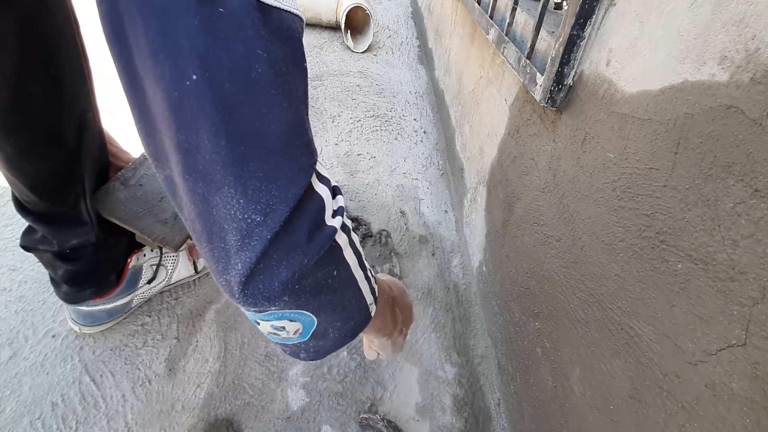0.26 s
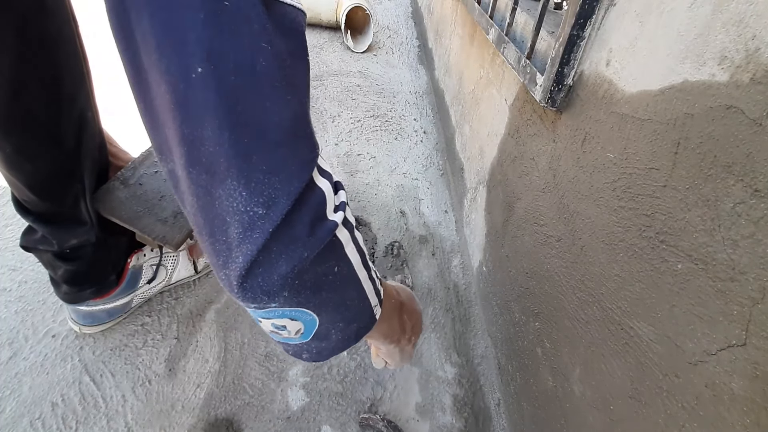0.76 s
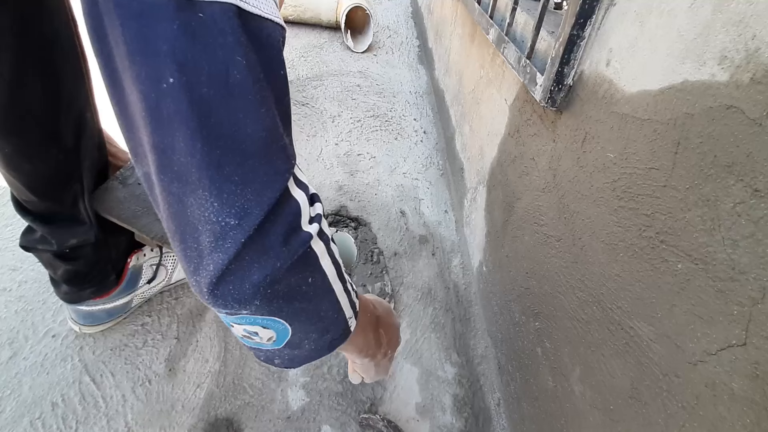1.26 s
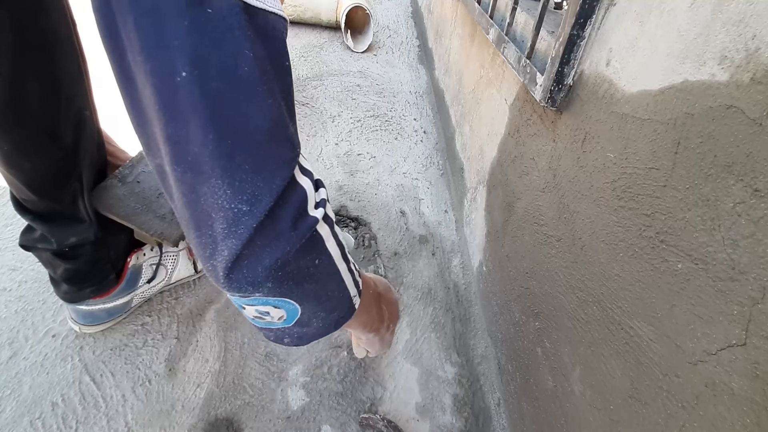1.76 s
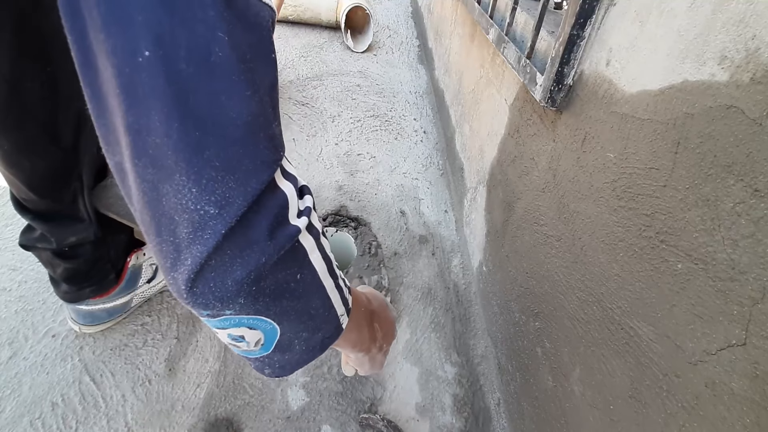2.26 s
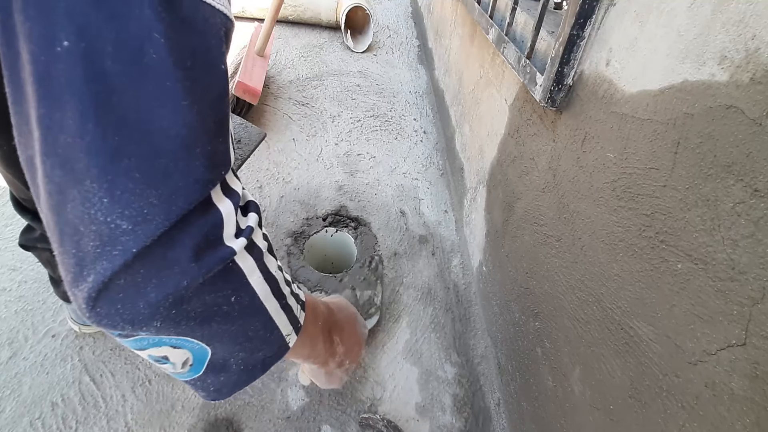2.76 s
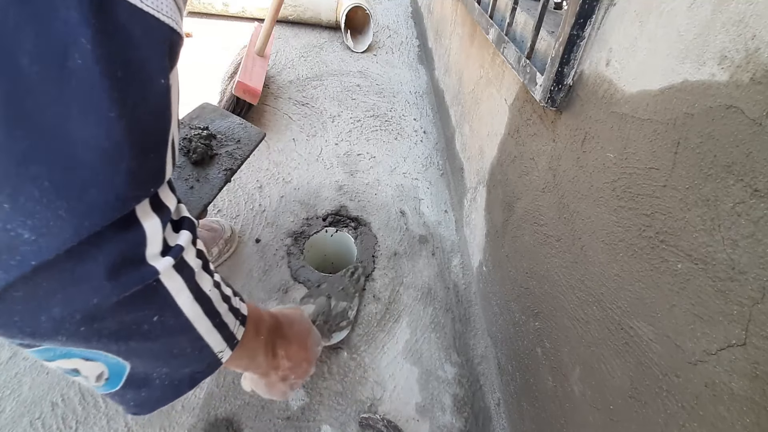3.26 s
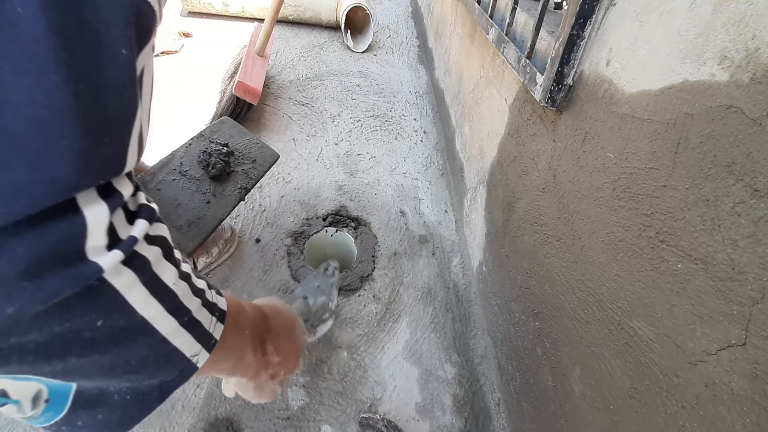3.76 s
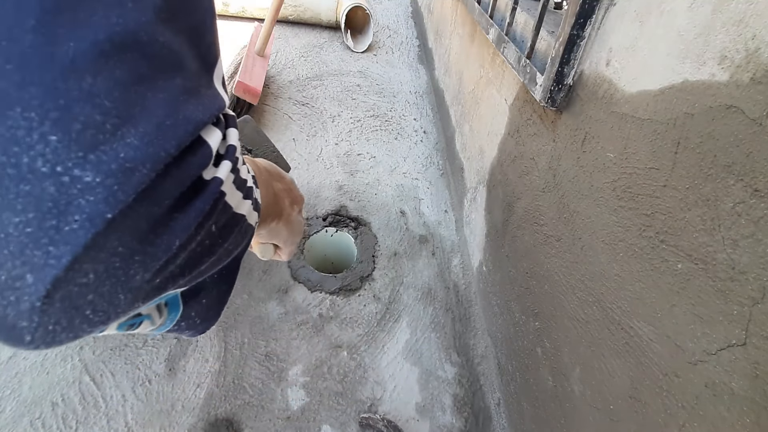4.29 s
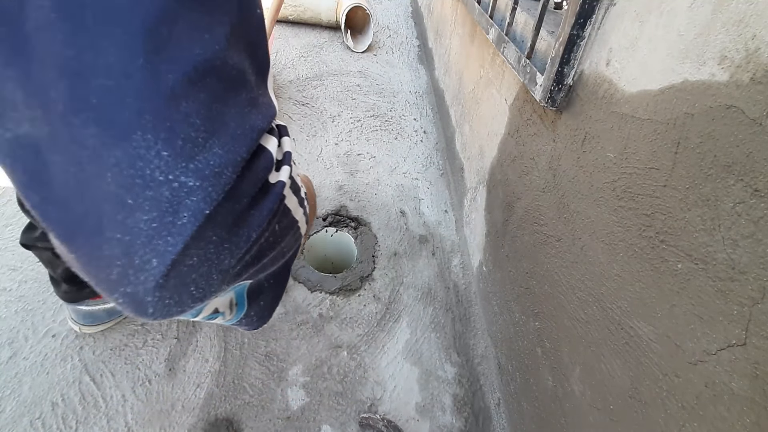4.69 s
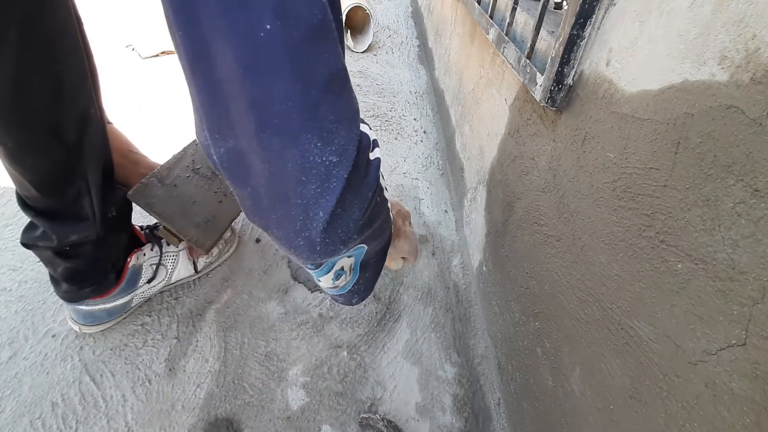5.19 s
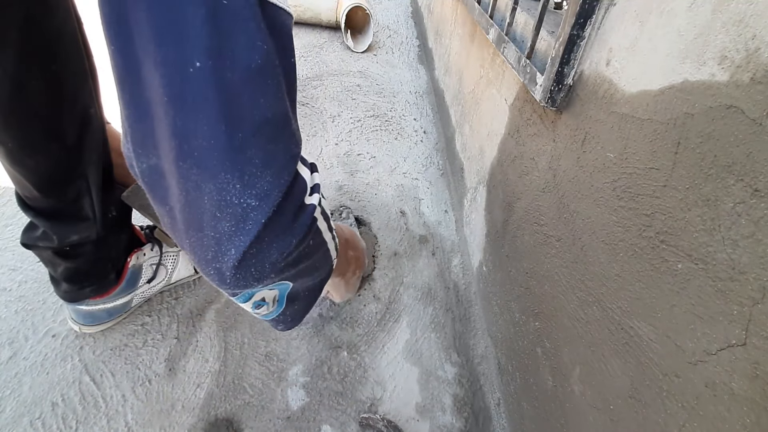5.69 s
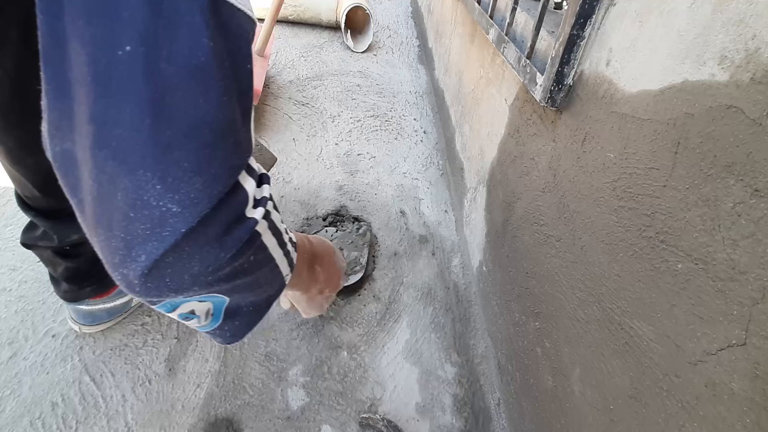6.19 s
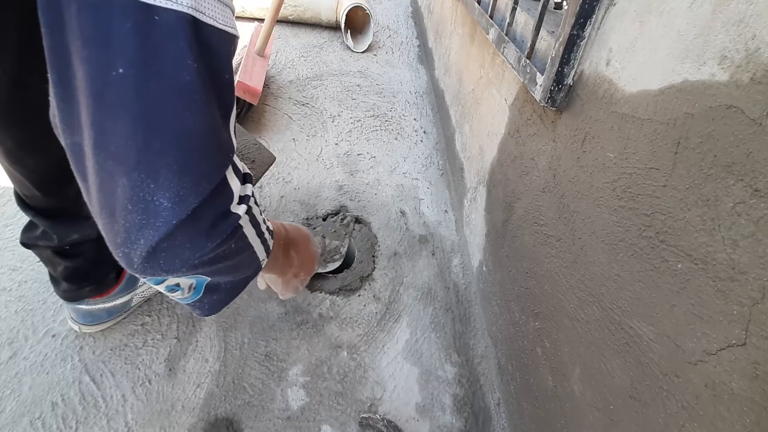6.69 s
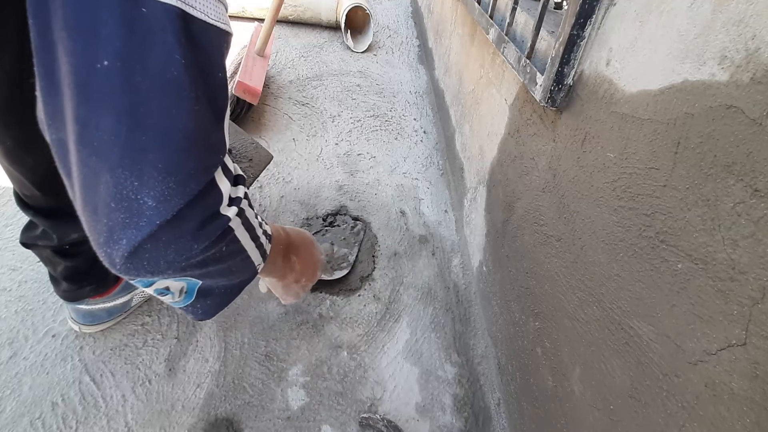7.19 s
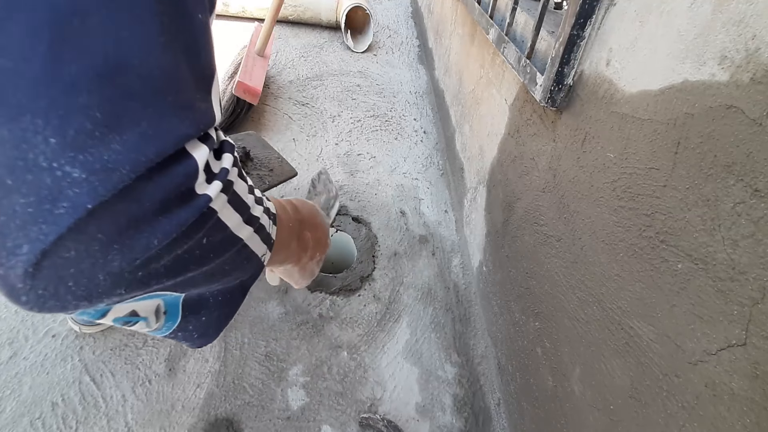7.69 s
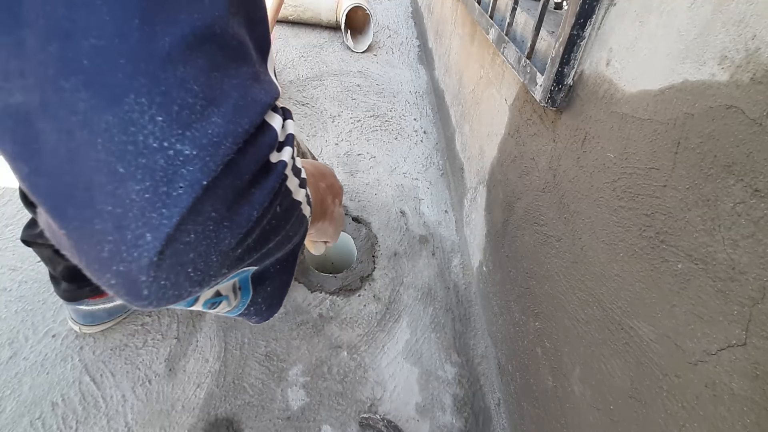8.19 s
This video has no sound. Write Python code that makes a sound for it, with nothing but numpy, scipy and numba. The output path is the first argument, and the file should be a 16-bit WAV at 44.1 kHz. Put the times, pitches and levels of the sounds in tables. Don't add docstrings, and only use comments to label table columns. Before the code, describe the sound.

Handheld stereo phone, close to a mason at work in a small walled yard. Bright, rough metal-on-grit scrapes come about every half second, with sharp snags and brief blade ring. Past four seconds they turn lighter and wetter, with a firm pass over a hollow pipe rim around six and a half. Quiet low rumble lies underneath; dull handling knocks appear near three seconds and most heavily near the end.

```python
import sys
import numpy as np
from scipy import signal
from scipy.fft import rfft, irfft
from scipy.io import wavfile
from scipy.ndimage import uniform_filter1d
from numba import njit

SR = 44100
rng = np.random.default_rng(int(sys.argv[2]) if len(sys.argv) > 2 else 0)


def put_to_file(sound):
    columns = np.atleast_2d(sound).T
    safe = np.clip(columns, -1, 1)
    whole_steps = np.round(safe * 32767)
    wavfile.write(sys.argv[1], SR, whole_steps.astype(np.int16))


def invert_db(x):
    u = np.asarray(x, float) / 20
    return 10 ** u


N = 372644

# time in [s], pressure of the edge on the grit in [dB].
FLOOR_STROKES = [
    [(0.0, -37), (0.07, -44), (0.14, -45), (0.152, -60), (0.17, -87.5)],
    [(0.44, -66), (0.48, -65.5), (0.5, -52), (0.546, -36.5), (0.666, -48.5), (0.718, -33.5), (0.76, -84)],
    [(1.088, -64.5), (1.14, -54), (1.222, -50.5), (1.232, -46), (1.372, -37.5), (1.42, -56.5), (1.465, -62),
     (1.49, -50), (1.566, -42.5), (1.61, -96)],
    [(1.802, -59), (1.842, -46.5), (1.92, -37.5), (2.068, -36), (2.108, -46), (2.135, -67)],
    [(2.39, -42), (2.5, -36), (2.57, -40.5), (2.59, -33.5), (2.624, -33), (2.685, -67.5)],
    [(2.946, -52.5), (3.0, -47), (3.04, -34.5), (3.086, -25.5), (3.16, -45.5), (3.19, -63.5)],
    [(3.45, -40.5), (3.488, -35.5), (3.666, -38.5), (3.705, -58)],
]
# time in [s], pressure in [dB].
MORTAR_STROKES = [
    [(4.218, -61), (4.316, -50.5), (4.53, -60.5), (4.58, -64.5), (4.63, -51), (4.67, -78)],
    [(5.17, -93), (5.242, -75.5), (5.3, -92)],
    [(5.727, -65.5), (5.78, -57.5), (5.82, -53), (5.93, -56.5), (6.005, -57), (6.022, -44.5), (6.075, -53),
     (6.12, -72)],
    [(6.35, -69.5), (6.408, -54.5), (6.546, -33.5), (6.625, -49.5), (6.65, -70), (6.689, -57)],
    [(6.69, -65), (6.706, -48.5), (6.89, -45.5), (6.986, -46.5), (7.07, -67.5)],
    [(7.22, -76), (7.275, -51), (7.31, -38.5), (7.482, -48.5), (7.51, -59.5)],
    [(7.56, -84.5), (7.636, -73), (7.736, -83), (7.95, -81)],
    [(8.17, -91.5), (8.19, -67), (8.316, -44), (8.45, -73.5)],
]
# bend in [Hz], bend in [dB] over grit,
# then gains in [dB] of the modes near 3, 4.3 and 5.5 kHz.
GRIPS = [(1632, -5.5, 2, 3, -4), (1680, -5, -1.5, -4.5, 0.5), (1665, -4.5, -2, 3, -5),
         (1620, -4.5, 2, 3.5, 0), (1664, -1.5, -2, 4, -6), (1680, 1.35, -3.5, 0, 3.5),
         (1649, 3.5, 2, -9, -0.5), (1520, -8, -4.5, -10, -14), (1510, -12, -14.5, -12, -12),
         (1604, -11.5, -6, -4, -6), (1580, -8, -1, -26, -5.5), (1500, -13, -1.5, -5, 3),
         (1560, -12, -3, -4, 0.5), (1545, -10, -9, -2, -3), (1390, -6, -5.5, -11, -13)]
# hollow under it in [Hz], hollow in [dB],
# edge fizz in [dB] over grit, left minus right in [dB].
PLACES = [(6010, -3, -12, -0.7), (5630, 10.5, -8.5, -2.5), (4800, -10, -11, 0.5), (7900, -19, -10, -1.2),
          (3900, -9, -8.5, -1.5), (3000, -1, -7.5, -0.5), (5600, -6, -8, -1), (7200, -7, -9, -0.5),
          (5900, 6, 4, 2.1), (3620, 7, -2.5, -0.5), (3980, -0.5, -8, 0), (3100, 3, -4.5, 0),
          (3940, -10, -4, 0), (4500, -2, -10, 3.5), (5200, -22.5, -9.5, 2)]
FIRM_DB, FIZZ_GAIN_PER_DB, BEND_GAIN_PER_DB = -41.5, 0.15, 0.2341
# time in [s], peak in [dB], blade bend in [dB] over it.
FLOOR_SNAGS = [(0.0388, -18, -6.5), (0.1121, -28.5, -31), (0.4963, -40, -24), (0.545, -19, -9),
               (0.623, -26.5, 10), (0.6961, -23, -8.5), (1.0899, -42, -9.5), (1.1551, -38.5, 2.5),
               (1.2276, -30.5, -13), (1.3349, -33.5, -4.5), (1.496, -36, -21), (1.5564, -29.5, -4),
               (1.8357, -32, -13), (1.9131, -23, -5), (1.956, -25.5, -20), (2.0099, -17, -7),
               (2.0629, -21.5, -8), (2.394, -36.5, 2), (2.4541, -20.5, -3), (2.5023, -13.5, -12),
               (2.582, -21.5, -25), (2.9512, -28.5, -15.5), (3.0416, -13.5, -6), (3.1475, -27.5, -0.5),
               (3.4553, -19.5, 3), (3.4874, -12, -3.5), (3.5416, -15, -6.5), (3.563, -20, -9),
               (3.6, -14.5, -12), (3.668, -24, -24)]
# time in [s], peak in [dB], decay t60 in [s].
MORTAR_SNAGS = [(4.2202, -44.5, .11), (4.3027, -31.5, 0.033), (4.5341, -42, 0.033), (5.245, -62, .03),
                (5.7304, -38, .05), (5.8088, -32.5, 0.038), (6.0186, -34, 0.048), (6.415, -30.5, 0.092),
                (6.4714, -42, .029), (6.502, -18, 0.054), (6.5333, -17.5, 0.046), (6.693, -34.5, 0.04),
                (6.871, -31, 0.13), (6.9187, -23.5, .05), (7.2785, -43, 0.037), (7.31, -30, 0.16),
                (8.2901, -39, 0.14), (8.3211, -22, 0.036)]
FLOOR_SNAG_T60_S, MORTAR_BEND_DB = 0.076, -20
# frequency in [Hz], density in [dB per Hz].
GRIT_COLOUR = [(150, -34), (280, -8.5), (600, -15), (1100, -11), (1900, -4.5), (3000, -5), (4500, -4.4),
               (6200, -6.7), (7600, -9), (9500, -19), (12000, -43.5)]
# frequency in [Hz], density in [dB per Hz].
FIZZ_COLOUR = [(4120, -40.5), (7000, -7.5), (9460, -12), (11800, -4), (12700, -7), (15000, -6.5),
               (16000, -14.5)]
# frequency in [Hz], width in [Hz], level in [dB],
# left minus right in [dB], lag of the right microphone port in [cycles].
PRESSED_BLADE = [(2437, 90, -13, 7, 0.082), (2960, 36, -11.5, -3.5, 0.34), (3427, 120, -12, 5.5, 0.19),
                 (3641, 220, -19.5, -7, 0.077), (4434, 130, -5.5, 3.5, 0.13), (5330, 130, -10.5, 5.5, 0.86),
                 (5900, 200, -15.5, 0.5, 0.31), (6700, 200, -21.5, -5, 0.93)]
BEND_WIDTH_HZ, BEND_PAN_DB = 150.0, 11.5
# frequency in [Hz], level in [dB], decay t60 in [s].
FREE_BLADE = [(1240, -5.5, 0.22), (1564, -14.5, 0.062), (2350, -8, 0.14), (3040, 4.5, 0.11),
              (3600, -13.5, 0.06), (4500, -10, 0.058), (6920, -25.5, 0.11)]
# time in [s], level in [dB].
LIFTS = [
    (.73, -54.5),
    (2.119, -59),
    (3.165, -51),
    (3.672, -39),
    (5.733, -51),
    (7.48, -59),
]
# start in [s], length in [s], boom in [dB],
# fade in [dB] over that length.
CROSSINGS = [(4.215, 0.13, -54.5, -12), (5.55, 0.13, -70, -3.5), (5.733, 0.22, -55, -6),
             (6.024, 0.056, -49, 1), (6.409, 0.082, -43.5, -7), (6.5, 0.11, -38, -8.5),
             (6.691, .1, -49, -0.5), (6.812, .1, -57, -1), (6.919, 0.125, -43, -19),
             (7.277, 0.091, -39, -7.5), (7.363, 0.13, -52, -6.5)]
PIPE_HZ, PIPE_WIDTH_HZ, RIM_EASE_S = 444.0, 62, 0.015
YARD_T60_S, YARD_DB = 0.28, -25.5
# frequency in [Hz], density in [dB per Hz].
TOWN_COLOUR = [(120, -36.5), (200, -4.5), (283, -1.5), (394, -12.5), (696, -13.5), (1000, -20), (1350, -26),
               (1600, -26), (1850, -35.5), (2600, -45), (8740, -50.5), (14600, -45), (16000, -49.5)]
TOWN_DB, TOWN_SWELL_DB = -58, 0.8
# frequency in [Hz], density in [dB per Hz].
RUMBLE_COLOUR = [(12, -62.5), (20, -33.5), (32, -21.5), (44, -5), (65, 2), (118, -1.5), (187, -8),
                 (220, -8.5), (290, -45), (480, -120)]
RUMBLE_DB, RUMBLE_WANDER_DB = -51, 1.5
# frequency in [Hz], correlation in [0-1].
LIKENESS = [(40, .45), (80, .62), (130, .85), (350, .85), (600, .3), (1500, .15), (5000, 0)]
# time in [s], rise in [dB], width in [s].
SHIFTS = [
    (1.15, 3, 0.062),
    (2.14, 4, .06),
    (2.73, 0.5, 0.092),
    (3.06, 10, 0.11),
    (6.05, 2.5, 0.086),
    (7.3, -1, 0.1),
    (8.32, 8.5, 0.12),
]
# time in [s], level in [dB], pitch in [Hz], decay t60 in [s].
THUMPS = [
    (2.091, -35, 50, 0.11),
    (3.041, -37.5, 110.2, 0.18),
    (3.486, -40, 297, 0.1),
    (3.547, -45, 270, .09),
    (8.221, -34, 62.7, 0.12),
    (8.271, -23, 60, 0.083),
    (8.356, -42.5, 61.4, 0.058),
]
TOP_HZ = 15700


def rms1(x):
    return x / np.sqrt(np.mean(x ** 2))


def on_log_hz(points, floor=None):
    hz, value = np.transpose(points)
    bins = np.maximum(np.arange(N // 2 + 1) * SR / N, 1)
    return np.interp(np.log(bins), np.log(hz), value, floor, floor)


def colour(x, spectrum):
    return irfft(rfft(x) * rms1(invert_db(on_log_hz(spectrum, floor=-90))), N)


@njit
def band(x, hz, width):
    y, b, l = np.empty(len(x)), 0., 0.
    for i in range(len(x)):
        g, k = np.tan(np.pi * hz[i] / SR), width / hz[i]
        v = (b + g * (x[i] - l)) / (1 + g * (g + k))
        b, l, y[i] = 2 * v - b, l + 2 * g * v, k * v
    return y


def mode(x, hz, width_hz):
    r = np.exp(-np.pi * width_hz / SR)
    return signal.lfilter([np.sqrt(2 * (1 - r * r))], [1, -r * np.exp(2j * np.pi * hz / SR)], x)


def walk(rate):
    hold = int(SR / rate)
    steps = np.repeat(rng.standard_normal(N // hold + 1), hold)
    return rms1(uniform_filter1d(uniform_filter1d(steps, hold), hold)[:N])


def pan(db):
    return invert_db(np.array([db, -db]).reshape(2, -1) / 2)


def background():
    t = np.arange(N) / SR
    shifts_db = sum(db * np.exp(-((t - s) / width) ** 2) for s, db, width in SHIFTS)
    hand = invert_db(RUMBLE_DB + RUMBLE_WANDER_DB * walk(5) + shifts_db)

    def layer():
        town = invert_db(TOWN_DB + TOWN_SWELL_DB * walk(4.6)) * colour(rng.standard_normal(N), TOWN_COLOUR)
        return town + hand * colour(rng.standard_normal(N), RUMBLE_COLOUR)

    mid, side = layer(), layer()
    like = np.clip(on_log_hz(LIKENESS), 0, 1)
    side = irfft(rfft(side) * np.sqrt((1 - like) / (1 + like)), N)
    return np.array([mid + side, mid - side])


def strokes():
    t, levels, grip = np.arange(N) / SR, np.zeros((3, N)), np.zeros((7, N))
    for stroke, hold, place in zip(FLOOR_STROKES + MORTAR_STROKES, GRIPS, PLACES):
        bend_hz, bend_db, *modes_db = hold
        gap_hz, gap_db, fizz_db, pan_db = place
        s, db = np.transpose(stroke)
        light = np.clip(FIRM_DB - db, -12, 25)
        over = (0, bend_db + BEND_GAIN_PER_DB * light, fizz_db + FIZZ_GAIN_PER_DB * light)
        inside = (t >= s[0]) & (t <= s[-1])
        ease = np.minimum((s[-1] - t[inside]) / 0.02, 1)
        levels[:, inside] = [ease * invert_db(np.interp(t[inside], s, db + rel)) for rel in over]
        held = np.array([bend_hz, *modes_db, gap_hz, gap_db, pan_db])
        grip[:, t >= s[0] - 0.005] = held[:, None]
    return levels, grip


def sand(spread_db, patchy_db, patch_rate):
    size_db = spread_db * np.minimum(rng.exponential(size=N), 5)
    grains = rng.standard_normal(N) * invert_db(size_db)
    return rms1(grains * invert_db(patchy_db * walk(patch_rate)))


def snags():
    grit, push, t = np.zeros(N), np.zeros(N), np.arange(N) / SR
    stones = [(s, db, bend_db, FLOOR_SNAG_T60_S) for s, db, bend_db in FLOOR_SNAGS]
    stones += [(s, db, MORTAR_BEND_DB, t60) for s, db, t60 in MORTAR_SNAGS]
    for s, db, bend_db, t60 in stones:
        start = max(s - 0.0012, 0)
        span = slice(int(start * SR), int((s + 0.15) * SR))
        age = np.maximum(t[span] - start, 0)
        rest = np.sqrt(max(1 - invert_db(2 * bend_db), 0.05))
        rise = 1 - np.exp(-age / 0.0014)
        crumble = invert_db(db - 5.5 - 60 * age / max(t60, 0.008))
        crack = invert_db(db - 9.5 - 60 * age / 0.0068)
        grit[span] += rest * rise * (crumble + crack)
        push[span.start] += np.sign(rng.standard_normal()) * invert_db(db + bend_db + 16)
    return grit, push


def ports(x, twist, turn_rate, count=6, size=256):
    out, power = 0, 0
    for _ in range(count):
        phase = twist * np.cumsum(rng.standard_normal((2, size // 2 + 1)), axis=1)
        paths = irfft(np.exp(1j * (phase - phase[:, :1])), size)
        paths = np.roll(paths, size // 2, axis=1)
        share = walk(turn_rate)
        heard = signal.oaconvolve(x[None], paths, axes=1)[:, size // 2:N + size // 2]
        out = out + share * heard
        power = power + share ** 2
    return out / np.sqrt(power)


def crunch(grains, force, gap_hz, gap_db):
    grit = colour(grains * force, GRIT_COLOUR)
    grit = grit + invert_db(gap_db - 4.0) * band(grit, np.clip(gap_hz, 2000, 9000), 900.)
    return invert_db(-3.0) * ports(grit, twist=0.5, turn_rate=35)


def pressed_blade(grains, force, modes_db):
    rings = 0
    for hz, width, db, pan_db, lag in PRESSED_BLADE:
        group = int(hz > 3700) + int(hz > 4900)
        drive = grains * force * invert_db(modes_db[group] + 4 * walk(40))
        swing = np.exp(2j * np.pi * np.cumsum(hz * (1 + 0.018 * walk(7))) / SR)
        ring = mode(drive / swing, 0, width) * swing
        turn = np.exp(-2j * np.pi * (lag + 0.24 * walk(14)))
        rings = rings + invert_db(db - 2.5) * pan(pan_db) * np.real([ring, ring * turn])
    return rings


def blade_bend(grains, force, press, bend, push, bend_hz):
    bend = np.sqrt(np.maximum(bend ** 2 - (invert_db(-11) * press) ** 2, 0))
    bend_hz = np.clip(bend_hz * (1 + 0.022 * walk(18)), 1200, 2000)
    shake = np.minimum(force / (press + 1e-9), 2.5) * invert_db(3 * walk(45))
    flex = band(grains * shake * bend * invert_db(-4.0) + push, bend_hz, BEND_WIDTH_HZ)
    flex = band(flex, bend_hz, 430.0) * np.sqrt(SR / np.pi / BEND_WIDTH_HZ)
    return pan(BEND_PAN_DB) * np.array([flex, np.roll(flex, shift=4)])


def edge_fizz(force, press, fizz):
    dust = sand(spread_db=3.5, patchy_db=4.0, patch_rate=110)
    dust = dust * force * np.minimum(fizz / (press + 1e-9), 3)
    return invert_db(-1.5) * ports(colour(dust, FIZZ_COLOUR), twist=0.55, turn_rate=40) * pan(-0.99)


def trowel():
    (press, bend, fizz), grip = strokes()
    bend_hz, modes_db, (gap_hz, gap_db, pan_db) = grip[0], grip[1:4], grip[4:]
    hit, push = snags()
    force = np.hypot(invert_db(1.5) * press, hit)
    grains = sand(spread_db=3.5, patchy_db=2.0, patch_rate=70)
    blade = crunch(grains, force, gap_hz, gap_db) + pressed_blade(grains, force, modes_db)
    blade = blade + blade_bend(grains, force, press, bend, push, bend_hz)
    blade = blade + edge_fizz(force, press, fizz)
    return blade * pan(pan_db) + pipe(grains)


def yard(x):
    t = np.arange(int(0.6 * SR)) / SR
    tail = rng.standard_normal((2, len(t))) * invert_db(-60 * t / YARD_T60_S) * (t > 0.006)
    tail = signal.lfilter([1], [1, -0.4], tail)
    tail *= invert_db(YARD_DB) / np.sqrt(np.sum(tail ** 2, axis=1, keepdims=True))
    return signal.fftconvolve(x, tail, axes=1)[:, :N]


def lifts():
    flick = np.zeros(N)
    for s, db in LIFTS:
        flick[int(s * SR)] = invert_db(db + 25)
    ring = 0
    for hz, db, t60 in FREE_BLADE:
        width_hz = np.log(1000) / np.pi / t60
        ring = ring + invert_db(db) * np.imag(mode(flick, hz, width_hz))
    return np.array([ring, np.roll(ring, shift=6)]) * pan(2.5)


def thumps():
    age = np.maximum(np.arange(N) / SR - np.array(THUMPS)[:, :1], 0)
    _, db, hz, t60 = np.transpose(THUMPS)[..., None]
    return np.sum(invert_db(db - 60 * age / t60) * np.sin(2 * np.pi * hz * age), axis=0)


def rim():
    t, rub = np.arange(N) / SR, 0
    for s, length, db, fade_db in CROSSINGS:
        level = invert_db(db + fade_db * np.clip((t - s) / length, 0, 1))
        to_end = np.minimum(t - s, s + length - t)
        rub = rub + level * np.clip(to_end / RIM_EASE_S + 0.5, 0, 1)
    return rub


def pipe(grains):
    boom = np.real(mode(grains * rim() * invert_db(2.5), PIPE_HZ, PIPE_WIDTH_HZ))
    boom = band(boom, np.full(N, PIPE_HZ), 380.0)
    return np.array([boom, np.roll(boom, shift=-10)]) * pan(0.84)


def scene():
    tool = trowel() + lifts()
    return tool + yard(tool) + background() * pan(0.6) + thumps()


def roll_off(x):
    return signal.sosfilt(signal.butter(12, 16610, fs=SR, output="sos"), x)


def record(dry):
    low = signal.butter(2, 42, "high", fs=SR, output="sos")
    top = signal.ellip(8, 0.2, 50, TOP_HZ, fs=SR, output="sos")
    mix = signal.sosfilt(np.vstack([low, top]), dry)
    return roll_off(mix)


dry = scene()
out = record(dry)
put_to_file(out)
```